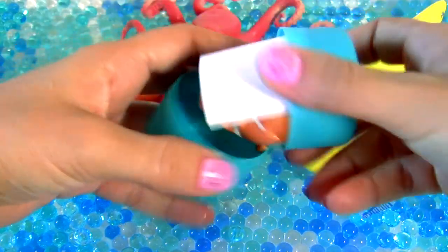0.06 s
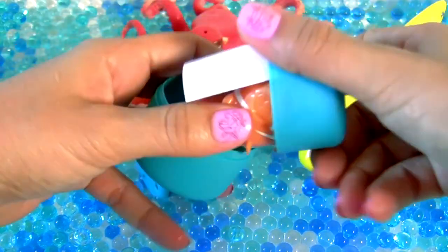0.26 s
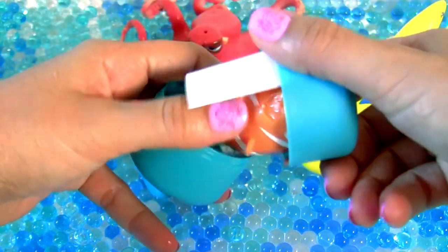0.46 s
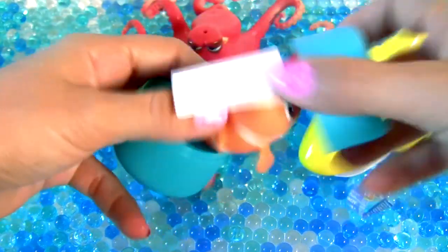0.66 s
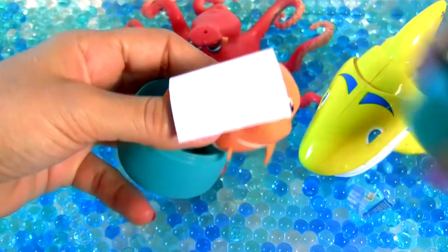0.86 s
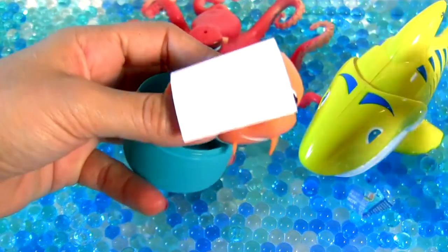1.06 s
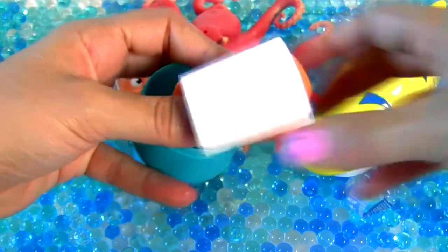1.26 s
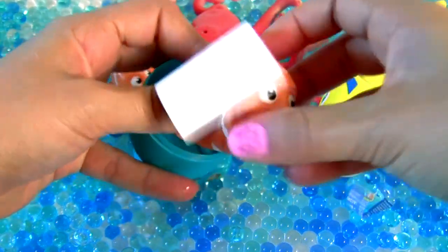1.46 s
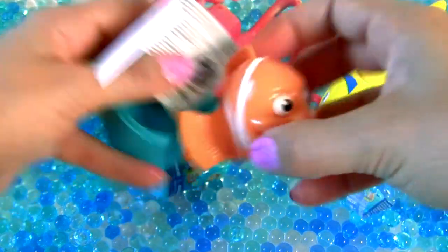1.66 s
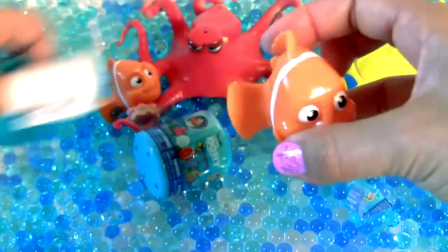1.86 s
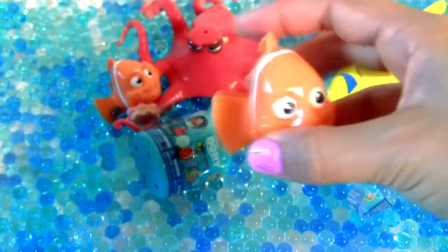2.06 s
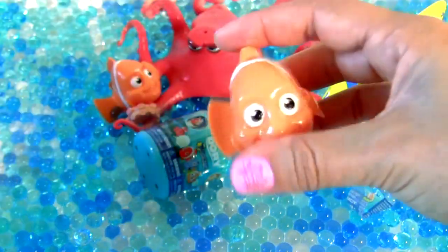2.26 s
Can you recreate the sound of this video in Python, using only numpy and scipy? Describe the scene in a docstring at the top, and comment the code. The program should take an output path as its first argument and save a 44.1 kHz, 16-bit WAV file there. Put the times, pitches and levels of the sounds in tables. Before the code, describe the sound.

Close stereo pickup of hands pulling a toy and folded paper from a plastic shell, rubbing and ticking, a pause, one loud plastic knock on a table, brief clicks and scuffs, over soft room rumble.

```python
"""Close in front of a stereo camera in a quiet room: steady hiss, rumble and a low wavering hum.
At once hands slide a toy and a folded leaflet out of a plastic capsule, a little right of centre:
skin and paper rub the shell in dense slip grains, and plastic edges tick as short pushes into its resonances.
The room answers with a short noise tail. Past the middle the cap drops on a table in three quick blows
and rings in decaying modes; a second spell of handling follows, then a few last scuffs and ticks."""
import sys
import numpy as np
from scipy import signal
from scipy.fft import rfft, irfft, next_fast_len
from scipy.io import wavfile
from scipy.ndimage import uniform_filter1d

SR = 44100
rng = np.random.default_rng(int(sys.argv[2]) if len(sys.argv) > 2 else 0)


def elevation(decibels):
    """Turn decibel levels (scalar or array-like) into linear amplitude ratios."""
    levels = np.asarray(decibels, float)
    return 10 ** (levels / 20)


def pcm_store(signal):
    """Save signal as 16-bit PCM."""
    levels = np.round(np.clip(np.atleast_2d(signal), -1, 1) * 32767)
    wavfile.write(sys.argv[1], SR, levels.astype(np.int16).T)


N = 101297  # length in samples
LEFT_RIGHT = np.array([[1], [-1]])  # opposite sign in the two channels
HANDS_PAN_DB, CAP_PAN_DB = -2.5, -4  # left minus right


def colour(x, points):
    """Filter by (Hz, dB) points joined on a log-frequency axis."""
    n, p = next_fast_len(x.shape[-1]), np.array(points, float)
    hz = np.maximum(np.arange(n // 2 + 1) * SR / n, 1)
    gain = elevation(np.interp(np.log(hz), np.log(p[:, 0]), p[:, 1]))
    return irfft(rfft(x, n) * gain, n)[..., :x.shape[-1]]


def unit(x):
    """Scale to rms 1."""
    return x / np.sqrt(np.mean(x ** 2))


def walk(rate):
    """Random levels, each held 1 / rate seconds and then slewed by a running mean; rms 1."""
    hold = int(SR / rate)
    steps = np.repeat(rng.standard_normal(N // 40 + 2), hold)[:N]
    return unit(uniform_filter1d(steps, hold))


# Room floor shared by both microphone channels. Each row: frequency in Hz, relative density in dB per Hz.
SHARED_FLOOR = [(20, -13), (60, -1), (125, -3), (250, -8), (600, -10.5), (1500, -17.5), (4000, -26.5),
                (9000, -33), (14000, -34.5), (16000, -50.5)]
# Room floor of opposite sign in the two channels. Each row: frequency in Hz, relative density in dB per Hz.
OPPOSITE_FLOOR = [(20, -9.5), (60, -21.5), (125, -13), (300, -13), (800, -19), (2000, -27), (7000, -39),
                  (14000, -49.5), (16000, -44.5)]
# Low hum in the room. Each row: frequency in Hz, level in dB rms about which it wavers.
HUM_TONES = [(29.3, -69), (58.8, -72), (117.6, -73.5)]


def background():
    """Hiss and rumble as coloured noise, shared and opposite, with sines wavering in level and phase as hum."""
    waver_db, waver_per_s, phase_rad = 5.5, 4.4, 1.4
    shared_db, opposite_db = -63.5, -60  # rms of each noise
    shared, opposite = rng.standard_normal((2, N))
    t = np.arange(N) / SR
    hum = np.zeros(N)
    for hz, db in HUM_TONES:
        level = np.sqrt(2) * elevation(db + waver_db * walk(waver_per_s))
        hum += level * np.sin(2 * np.pi * hz * t + phase_rad * walk(waver_per_s))
    shared = elevation(shared_db) * unit(colour(shared, SHARED_FLOOR))
    opposite = elevation(opposite_db) * unit(colour(opposite, OPPOSITE_FLOOR))
    return shared + hum + opposite * LEFT_RIGHT


def ring(x, hz, width_hz):
    """Two-pole resonance, gain 1 at the centre."""
    return signal.lfilter(*signal.iirpeak(hz, hz / width_hz, fs=SR), x)


# Resonances of the hand-held shell and toy.
# Each row: frequency in Hz, width in Hz, level in dB before the contact's weighting.
SHELL_MODES = [(230, 93, 2), (520, 88, 7.5), (970, 130, 7.5), (1300, 420, 1.5), (1650, 119, 6.5),
               (2056, 110, 3), (2450, 170, 3.5), (2900, 400, -5), (3500, 210, 0.5), (3886, 470, -5.5),
               (4900, 220, -4.5)]


def shell(force, hz, skirt_db):
    """The shell's resonances, weighted around the contact's pitch; the grip bends the nearest one onto it."""
    focus_oct, octave_db = 0.45, 5  # width of the favoured region; lift of an octave above over the skirt

    def near(f):
        return np.exp(-(np.log2(f / hz) / focus_oct) ** 2)

    def weight(f):
        octave_above = elevation(skirt_db + octave_db) * near(f / 2)
        skirt = elevation(skirt_db) * min(2 * f / hz, 1)  # lower still for the deep resonances
        return max(near(f), octave_above, skirt)

    bent = np.argmin([abs(np.log(f / hz)) for f, _, _ in SHELL_MODES])
    body = 0
    for k, (f, width_hz, db) in enumerate(SHELL_MODES):
        centre = hz if k == bent else f
        body = body + (-1) ** k * elevation(db) * ring(force * weight(f), centre, width_hz)
    return body


# Bright scratch of every contact. Each row: frequency in Hz, relative density in dB per Hz.
SCRATCH_COLOUR = [(1500, -27.5), (3000, -2), (5000, 3), (6600, -3), (8000, 3.5), (10500, -1), (13000, -5.5),
                  (16000, -4.5)]


def scratch(noise):
    """Bright contact noise, coloured and scaled to rms 1."""
    return unit(colour(noise, SCRATCH_COLOUR))


# Scuffs of skin and paper, close to the camera. Each row: start in seconds, length in ms,
# body level in dB rms, pitch in Hz, scratch level in dB re the body level.
SCUFF_EVENTS = [(0.072, 7.7, -45.5, 1700, -21), (0.108, 31, -46.5, 1700, -1.5),
                (0.13, 45.5, -52.5, 1576, -9.5), (0.161, 77, -60.5, 1700, -6.5),
                (0.187, 9, -58.5, 3500, -32), (0.229, 47, -54.5, 1650, -12.5), (0.268, 29, -60, 2450, -6.5),
                (0.346, 44, -63.5, 1940, -6), (0.439, 280, -62, 1650, -12.5), (0.556, 105, -58, 2110, -8.5),
                (0.589, 20, -54, 2470, -8.5), (0.604, 22, -52.5, 4370, -10), (0.6173, 24.4, -45, 2370, -12),
                (0.636, 56, -48, 2260, -5.5), (0.669, 8.7, -51, 2300, -12), (0.677, 17, -47.5, 2040, -3),
                (0.694, 24.3, -47, 4900, -3), (0.711, 104, -62.5, 1570, 1.5),
                (0.771, 15.5, -52, 2900, -0.5), (.79, 184, -70, 3400, -3.5),
                (1.189, 19.3, -72.5, 3500, 11.5), (1.37, 68, -54, 4734, -0.5), (1.618, 58, -65, 3100, -4),
                (1.678, 12, -56, 4950, -5), (1.703, 31, -52.5, 2900, -3.5), (1.725, 16.4, -51.5, 1720, 4.5),
                (1.737, 20, -61, 2750, 0), (2.048, 28, -70.5, 2620, 5.5), (2.184, 13.8, -58, 520, -38),
                (2.213, 9.9, -55, 840, -7), (2.222, 28, -61.5, 1030, -0.5)]


def rubbing():
    """Dense slip grains of uneven size drive the shell and a scratch; each scuff swells, holds and fades."""
    grains_per_s, grain_spread_db = 5000, 1.2
    body_flicker_db, scratch_flicker_db = 2.0, 1.2
    swell, fade = 0.073, 0.57  # shares of the length
    skirt_db, tail = -10, 1024  # tail in samples, for the shell to ring on
    out = np.zeros(N + SR)
    slips = rng.random((2, N)) < grains_per_s / SR
    grains = slips * rng.standard_normal((2, N))
    flicker_db = np.array([body_flicker_db * walk(250), scratch_flicker_db * walk(200)])
    grains = grains * elevation(grain_spread_db * rng.exponential(size=(2, N)) + flicker_db)
    bright = scratch(grains[1])
    for s, ms, db, hz, scratch_db in SCUFF_EVENTS:
        i, n = int(s * SR), int(ms * SR / 1000)
        span = slice(i, i + n + tail)
        place = np.arange(n + tail) / n
        ramp = np.clip(np.minimum(place / swell, (1 - place) / fade), 0, 1)
        shape = np.sin(np.pi / 2 * ramp) ** 2
        # a soft scuff with little scratch keeps closer to its pitch
        body = shell(grains[0, span] * shape, hz, skirt_db + min(scratch_db, 0) * 0.5)
        body = body / np.sqrt(np.sum(body ** 2) / np.sum(shape ** 2))
        out[span] += elevation(db) * (body + elevation(scratch_db) * bright[span] * shape)
    return out[:N]


# Scatter around the camera body. Each row: frequency in Hz, gain in dB.
PORT_SCATTER = [(300, -18), (1500, -8.5), (3000, -16), (5000, -5), (12000, -4.5)]


def ports(x, pan_db):
    """Pan, plus short scatter round the camera body that reaches its two ports with opposite sign."""
    decay_ms = 1.5
    scatter = rng.standard_normal(256) * np.exp(-np.arange(256) * 1000 / SR / decay_ms)
    scatter = scatter / np.sqrt(np.sum(scatter ** 2))
    side = colour(signal.lfilter(scatter, 1, x), PORT_SCATTER)
    return (x + side * LEFT_RIGHT) * elevation(pan_db * LEFT_RIGHT / 2)


# Tail of the room. Each row: frequency in Hz, level in dB, t60 in seconds.
ROOM_TAIL = [(190.4, -15.5, .25), (520, -4.5, 0.56), (1200, -8.5, 0.63), (2585, -10.5, 0.46),
             (3727, -6, 0.43), (5860, -8.5, 0.418), (10000, -14, 0.31)]


def room(x):
    """A noise tail whose level and decay change smoothly with frequency, partly alike in both channels."""
    gap_s, likeness = 0.0014, 0.75  # silence before the tail, which then fades in over as long again
    t = np.arange(SR // 2) / SR
    mid, side = rng.standard_normal((2, len(t)))
    pair = rfft(np.sqrt(1 + likeness) * mid + np.sqrt(1 - likeness) * side * LEFT_RIGHT)
    log_hz = np.log(np.arange(1, pair.shape[1] + 1) * SR / len(t))
    centres = np.log([row[0] for row in ROOM_TAIL])
    tail = 0
    for share, (_, db, t60) in zip(np.eye(len(ROOM_TAIL)), ROOM_TAIL):
        band = irfft(pair * np.interp(log_hz, centres, share), len(t))
        decay = np.exp(-np.log(1000) * t / t60) / np.sqrt(SR * t60 / np.log(1000))
        tail = tail + elevation(db) * band * decay
    tail = tail * np.clip(t / gap_s - 1, 0, 1)
    return signal.fftconvolve(x[None], tail, axes=1)[:, :N]


# Ticks of hard plastic edges, close to the camera. Each row: start in seconds, body peak in dB,
# pitch in Hz, scratch level in dB re that peak.
TICK_EVENTS = [(0.1063, -40, 930, -41), (0.111, -45, 1670, -12), (0.147, -35, 1300, -38),
               (.251, -42, 1020, -17), (0.515, -39, 2250, -29), (0.5659, -40.5, 1940, -37),
               (0.6448, -34, 2460, -33), (0.689, -31.5, 4900, -15.5), (0.7034, -24.5, 2083, -12),
               (0.73, -39.5, 860, -14), (0.8411, -40.5, 3430, -15), (0.8654, -41.5, 3460, -37),
               (1.3450, -25.5, 3740, -14.5), (1.6172, -39, 3500, -9.5), (1.7015, -29, 4070, -27),
               (1.7011, -31.5, 1720, -13), (1.704, -35.5, 461, -30), (1.7266, -40, 4900, -6),
               (1.7289, -37.5, 245, -32), (1.7542, -45, 1200, -22), (2.212, -47, 1700, -24),
               (2.237, -58.5, 1463, -2.5)]


def ticks():
    """Each tick is a very short rough push into the shell with a bright scratch on top."""
    contact_ms, rise_share, roughness = 1, 0.68, 0.05  # decay; rise as a share of it; chatter after touch
    skirt_db, n = -11, 2048
    out, ms = np.zeros(N + n), np.arange(n) * 1000 / SR
    push = (1 - np.exp(-ms / (rise_share * contact_ms))) * np.exp(-ms / contact_ms)
    noises = rng.standard_normal((len(TICK_EVENTS), 2, n))
    for (s, db, hz, scratch_db), (chatter, hiss) in zip(TICK_EVENTS, noises):
        force = signal.unit_impulse(n) + roughness * chatter * push
        body = shell(force, hz, skirt_db)
        top = scratch(hiss) * push / push.max()
        i = int(s * SR)
        out[i:i + n] += elevation(db) * (body / np.abs(body).max() + elevation(scratch_db) * top)
    return out[:N]


# Blows of the dropped cap on the table. Each row: start in seconds, level in dB.
CAP_BLOWS = [(1.3507, -9.5), (1.3516, -10), (1.3540, -14.5)]
# Modes of cap and table. Each row: frequency in Hz, level in dB re the blow before build-up, t60 in seconds.
CAP_MODES = [(216, -22, 0.079), (320, -28, 0.13), (472, -13.5, 0.12), (541.7, -11, 0.14), (684, -2, 0.078),
             (980, -20, 0.049), (1126, -16, 0.094), (1259, -5, 0.017), (1433, -2, 0.018),
             (1620, -13.5, 0.036), (1810, -0.5, 0.018), (1940, -24, 0.03), (2210, -14.5, 0.012),
             (2640, 1, 0.013), (3010, -20, 0.018), (3500, -27, 0.0027), (4200, -20, 0.01)]


def cap_drop():
    """The cap's rim meets the table in quick blows; each rings the same modes, sign turning every second one."""
    crack_db, crack_ms = -17.5, 2.9
    rise_cycles = 0.4  # each mode builds up over part of its own period, so the lows come late
    cap_low_cut_hz = 70.5
    out, t = np.zeros(N), np.arange(N) / SR
    for (s, db), noise in zip(CAP_BLOWS, rng.standard_normal((len(CAP_BLOWS), N))):
        age = np.maximum(t - s, 0)
        modes = np.zeros(N)
        for k, (hz, mode_db, t60) in enumerate(CAP_MODES):
            envelope = np.exp(-np.log(1000) * age / t60) * (1 - np.exp(-age * hz / rise_cycles))
            modes += (-1) ** (k // 2) * elevation(mode_db) * np.sin(2 * np.pi * hz * age) * envelope
        crack = elevation(crack_db) * scratch(noise) * np.exp(-age * 1000 / crack_ms) * (t >= s)
        out += elevation(db) * (modes + crack)
    return signal.sosfilt(signal.butter(2, cap_low_cut_hz, "high", fs=SR, output="sos"), out)


def scene():
    """Hands and cap a little right of centre, with the room and its floor."""
    hands_room_db = -9  # the hands are nearer than the table, so drier
    feed_fade_ms = 11  # the cap's feed to the room fades over this time, so its tail is noisy, not tonal
    hands, cap = ticks() + rubbing(), cap_drop()
    age = np.maximum(np.arange(N) / SR - CAP_BLOWS[0][0], 0)
    cap_feed = cap * np.exp(-age * 1000 / feed_fade_ms)
    direct = ports(hands, HANDS_PAN_DB) + ports(cap, CAP_PAN_DB)
    # the tail leans half as far to the right as the hands
    tail = room(hands * elevation(hands_room_db) + cap_feed) * elevation(HANDS_PAN_DB * LEFT_RIGHT / 4)
    return direct + tail + background()


def band_limit(x):
    """A steep low-pass at the top of the band."""
    return signal.sosfilt(signal.butter(12, 16690, fs=SR, output="sos"), x)


def record(dry):
    """The camera cuts the treble steeply above 15.7 kHz."""
    low_pass = signal.ellip(8, 0.2, 70, 15700, fs=SR, output="sos")
    mix = signal.sosfilt(low_pass, dry)
    return band_limit(mix)


dry = scene()
out = record(dry)
pcm_store(out)
```